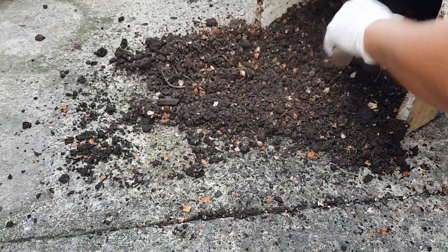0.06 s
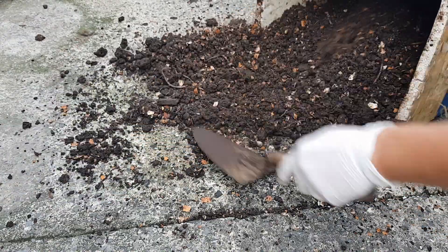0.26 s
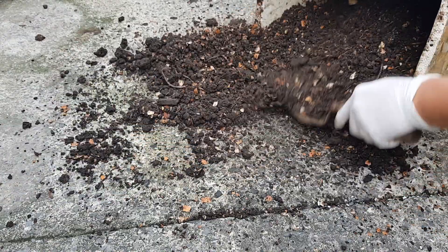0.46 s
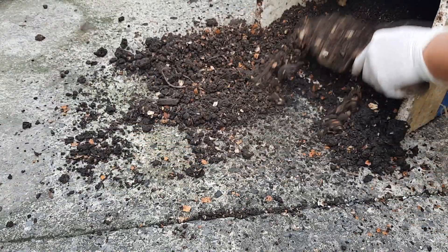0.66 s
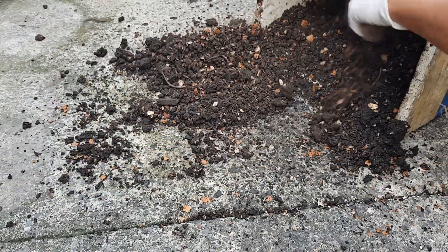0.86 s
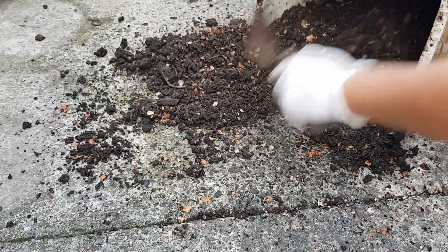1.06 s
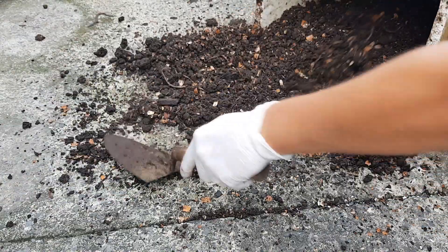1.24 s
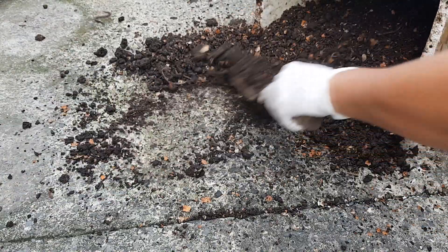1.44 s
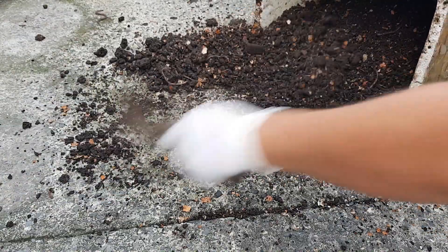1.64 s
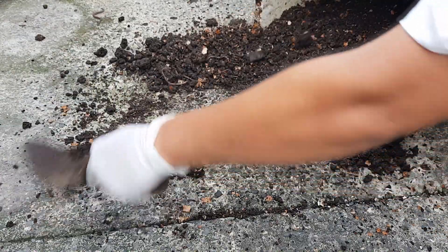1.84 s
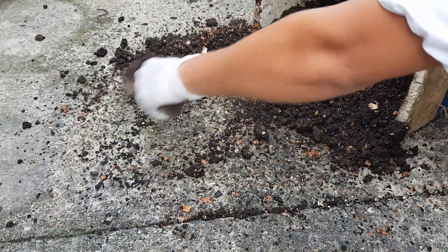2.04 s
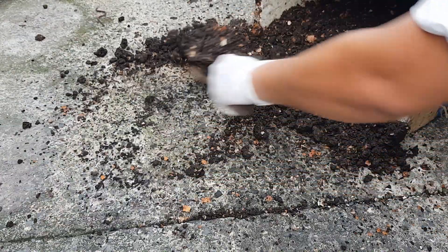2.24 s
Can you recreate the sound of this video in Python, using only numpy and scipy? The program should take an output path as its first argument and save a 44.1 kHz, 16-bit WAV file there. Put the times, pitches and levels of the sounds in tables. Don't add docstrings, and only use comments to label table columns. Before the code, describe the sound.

A small metal trowel scrapes gritty compost over rough concrete in three short, ringing strokes outdoors

```python
import sys
import numpy as np
from scipy import signal
from scipy.fft import rfft, irfft, next_fast_len
from scipy.io import wavfile
from scipy.ndimage import uniform_filter1d, map_coordinates

SR = 44100
rng = np.random.default_rng(int(sys.argv[2]) if len(sys.argv) > 2 else 0)


def dump(signal):
    limited = np.clip(np.atleast_2d(signal).T, -1, 1)
    pcm = np.round(limited * 32767).astype(np.int16)
    wavfile.write(sys.argv[1], SR, pcm)


def boost(x):
    u = np.asarray(x, float) / 20
    return 10 ** u


N = 101429

SKID_STARTS = [.330, .343, .370, .381, .403, .426, .438, .452, .467, .478, 1.279, 1.296, 1.324, 1.339,
               1.367, 1.390, 1.412, 1.438, 1.795, 1.82, 1.841, 1.858, 1.877, 1.902, 1.927, 1.947, 1.975,
               1.994, 2.014, 2.036, 2.107, 2.133, 2.161, 2.197, 2.245]
# pressure/dB, bare steel on concrete/dB, length/s
SKIDS = [(-32.5, -3, 0.021), (-20.5, 0.5, 0.017), (-21.5, 4, 0.016), (-21.5, -3.5, 0.013), (-21, 3, 0.011),
         (-29.5, -13.5, 0.01), (-25, -10.5, 0.0069), (-33.5, 6, .013), (-26.5, -15.5, 0.005),
         (-38, 0, 0.048), (-27.5, -1.5, 0.019), (-29, -2.5, 0.018), (-22.5, -2.5, 0.012),
         (-23.5, 7.5, 0.028), (-21, 0, 0.027), (-20.5, 0, 0.02), (-27.5, 1.5, 0.018), (-42.5, -17.5, 0.061),
         (-35.5, 1, 0.018), (-33.5, 0.5, 0.019), (-28, 3, .014), (-27.5, 3, 0.015), (-40, 0, .025),
         (-27, 8, 0.025), (-29, 5, .019), (-23, -1, 0.017), (-37.5, -3, 0.016), (-25, 0.5, 0.02),
         (-32, 5, 0.022), (-35.5, -4, 0.046), (-38, -10, 0.016), (-49.5, -10, .01), (-39, -4.5, 0.016),
         (-39.5, -26, 0.031), (-36, -23, 0.0081)]
# start t/s, pitch ratio
STROKES = [
    (0, 1.0),
    (1, .978),
    (1.6, .982),
]
# f/Hz, width/Hz, level/dB in strokes 1, 2 and 3
BLADE = [(1195, 70, -17.5, -16.5, -18.5), (1600, 100, -6, -6.5, -5), (1725, 54.4, 2.5, 1.5, 0.5),
         (2137, 79, -12, -6.5, -8.5), (2325, 43, -15, -20, -23.5), (2928, 80, -11.5, -5.5, -9),
         (3730, 72, -8, -12, -10.5), (4100, 36, -20, -5.5, -14), (4480, 99, -14, -17, -14),
         (5440, 77, -7.5, -22, -6.5), (6660, 82, -9.5, -25, -9), (9200, 540, -15, -13, -13),
         (10000, 284, -13, -17.5, -13), (15320, 430, -10.5, -11, -14.5)]
# f/Hz, level per Hz/dB
GRIT = [(150, -58), (250, -19), (1700, -9), (2910, -4.5), (3340, -9.5), (5440, -13.5), (8120, -5),
        (14700, -9), (16000, -40.5)]
# t/s, crack level/dB, ring level/dB, crack t60/s
CATCHES = [(.3445, -7, -28, 0.025), (.353, -13, -35, .015), (.3705, -5.5, -27, 0.019),
           (.3805, -5.5, -22, 0.017), (.3855, -6.5, -27, .02), (.403, 1.5, -9.5, 0.022),
           (.4255, -12.5, -34, 0.01), (.4388, -3, -51, 0.027), (.4676, -2, -30, 0.0092),
           (1.2796, -10, -26.5, 0.0143), (1.296, -8.5, -42, .018), (1.3245, -12, -26, 0.015),
           (1.3395, -10, -25, 0.0207), (1.359, -5.5, -22, .015), (1.3673, -5, -18, 0.023),
           (1.3725, -5, -14.5, .012), (1.3903, -4, -22, 0.024), (1.413, -17, -29.5, 0.024),
           (1.428, -12.5, -51, .015), (1.7952, -20.5, -36.5, .015), (1.835, -15.5, -38, .018),
           (1.8495, -9, -38, 0.03), (1.858, -5.5, -24, 0.018), (1.9035, -10.5, -33, .02),
           (1.918, -13.5, -43, .018), (1.927, -14, -28, .015), (1.930, -9, -31, 0.0098),
           (1.9475, -6, -43, .014), (1.996, -12.5, -47, 0.018), (2.017, -15.5, -34, 0.028),
           (2.042, -13.5, -36, .015), (2.111, -14, -52, .018), (2.1335, -29.5, -55, .02),
           (2.163, -20.5, -46, .022), (2.1825, -28.5, -43.5, .016), (2.198, -29.5, -56, .016),
           (2.206, -25.5, -50, 0.035), (2.2465, -19.5, -60, 0.022)]
# t/s, level/dB, f/Hz, t60/s
CLODS = [(0.055, -28.5, 285, 0.089), (0.074, -33, 237, 0.25), (0.230, -22, 262, 0.088),
         (0.594, -38, 405, 0.033), (0.734, -34.5, 247, 0.14), (0.753, -30.5, 235, 0.04),
         (0.887, -31, 266, 0.11), (0.916, -26, 266, 0.091), (.925, -30.5, 586, 0.037),
         (1.157, -41, 310, 0.049), (1.167, -30.5, 170, 0.057), (1.194, -33.5, 520, 0.03)]
# t/s, level/dB, f/Hz, t60/s
LANDINGS = [
    (.229, -23.5, 160.5, 0.079),
    (1.2792, -15.5, 757, 0.02),
    (1.795, -30.5, 463, 0.043),
    (2.109, -35, 573, 0.077),
    (2.246, -40.5, 584, 0.034),
]
# t/s, level/dB, f/Hz, t60/s
PEBBLES = [(0.2164, -33.5, 1644, 0.022), (0.2485, -9, 1020, 0.0053), (.289, -46, 2450, 0.0093),
           (0.2928, -30.5, 1663, 0.084), (.7, -46, 1716, 0.062), (1.2796, -16, 1410, 0.036),
           (1.3147, -15.5, 1754, 0.039), (1.7952, -27.5, 1250, 0.036), (1.8404, -26, 1890, 0.026),
           (2.1086, -27.5, 2820, 0.03), (2.1595, -38, 2640, 0.038), (2.2047, -32.5, 2886, 0.038),
           (2.134, -39, 2920, 0.03975), (2.2445, -24, 2530, 0.022)]
# t/s, level/dB, t60/s
CRUMBS = [(0.1187, -29.5, 0.047), (1.226, -36, 0.056), (1.7417, -38, 0.03), (1.7696, -36.5, 0.02),
          (0.648, -44, .03), (1.2, -44.5, 0.074), (2.164, -24.5, 0.028)]
# t/s, flow level/dB, coarseness/dB
TRICKLE = [(0, -54.5, -0.5), (.07, -49.5, 15.5), (.19, -55.5, 4), (.5, -45.5, 1.5), (.68, -56, 0.5),
           (.75, -43.5, 4.5), (.79, -57, -5), (.9, -48.5, -1.5), (.93, -52, 7.5), (1.14, -60.5, 3.5),
           (1.2, -47.5, 14.5), (1.27, -58.5, -1.5), (1.5, -50, -1), (1.62, -66.5, -7.5), (1.78, -54, -3.5),
           (2.1, -42, -2.5), (2.3, -49, -9.5)]
# f/Hz, level per Hz/dB
FINE = [(530, -48), (900, -14), (2450, -6.5), (2830, -9.5), (11100, -9.5), (16000, -10)]
COARSE = [(94, -2.5), (160, 3.5), (199, -5.5), (248, -3), (594, -10.5), (2500, -29.5), (3250, -42),
          (5500, -120)]
# f/Hz, level per Hz/dB
TRAFFIC = [(12, -68.5), (20, -9.5), (113, -7.5), (146, -16), (394, -67), (442, -86.5), (1890, -61),
           (3540, -43), (5000, -61), (6500, -103.5), (11000, -120)]
HISS = [(500, -29.5), (1500, 1), (4000, -5), (12000, -4), (16000, 0)]
# f/Hz, likeness (1 = the same)
ALIKE = [(100, .99), (600, .85), (1700, .93), (3000, .5), (10000, .1)]
FAR_ALIKE = [(60, 1), (300, 0.87), (1500, 0), (8000, 0)]
# f/Hz, level/dB
LEAN = [(200, -0.5), (600, -5), (1700, -2.5), (3000, -4), (8000, -1.5), (14000, -6)]
FAR_LEAN = [(100, 0), (600, -5), (10000, -6)]
# f/Hz, t60/s
YARD_T60 = [(300, 0.072), (2000, 0.14), (12000, 0.036)]

GRAINS_PER_S, GRAIN_SPREAD_DB, GRAIN_S = 2200, 2.6, .0010
GRIT_PATCHY_DB, RING_PATCHY_DB, RING_DB = 4, 3.2, -2
BITE_S, BITE_GAIN, BITE_FADE_S = 0.0016, 0.54, 0.004
SAG_DB_PER_S, LIFT_DB_PER_S = 136, 1500.5
BENDING_HZ = 2000
MODE_SCATTER_DB, CATCH_DULL_DB_PER_OCTAVE = 4.5, -4
TRICKLE_PATCHY_DB, LUMPY_DB, COARSE_DB = 2, 2.2, -49.5
TRAFFIC_DB, HISS_DB, YARD_DB = -40.5, -60, -12.5
BIRD_S, BIRD_LENGTH_S, BIRD_FALL_S, BIRD_DB = 1.675, .11, .03, -58
BIRD_HIGH_HZ, BIRD_LOW_HZ, BIRD_BLUR_HZ = 3900, 2350, 190
SCATTER_T60, LEFT_LEAD_S = 0.0034, .00007
NEAR_DIP_HZ, NEAR_DIP_WIDTH_HZ, NEAR_DIP_DB = 3220, 150, -11
PORT_DIP_HZ, PORT_DIP_WIDTH_HZ, PORT_DIP_DB = 8110, 820, -7
LOW_CUT_HZ, TOP_HZ, SKIRT_DB, LIMIT = 44, 15900, -43, .9


def scrape():
    crunch, shake = np.zeros(N), np.zeros(N)
    t = np.arange(SR // 6) / SR
    for s, (pressure_db, bare_db, length) in zip(SKID_STARTS, SKIDS):
        lift_db = LIFT_DB_PER_S * np.maximum(t - length, 0)
        skid = boost(pressure_db - SAG_DB_PER_S * t - lift_db) * (1 - np.exp(-t / BITE_S))
        skid = skid * (1 + BITE_GAIN * np.exp(-t / BITE_FADE_S))
        add(crunch, s, skid)
        add(shake, s, boost(bare_db) * skid)
    rough = grains(GRAINS_PER_S, GRAIN_SPREAD_DB)
    jolts = patchy(rough, RING_PATCHY_DB, bins=2, frames=5)
    stroke_now = loading()
    ringing = np.zeros(N)
    for k in range(len(STROKES)):
        ringing += filtered(jolts * shake * (stroke_now == k), lambda hz: steel(hz, k))
    ringing /= np.std(filtered(jolts, lambda hz: steel(hz, stroke=0)))
    grit = patchy(coloured(rough, GRIT), GRIT_PATCHY_DB, bins=9, frames=3)
    return crunch * grit + boost(RING_DB) * ringing


def catches():
    out, t = np.zeros(N), np.arange(SR // 8) / SR
    stroke_now = loading()
    grit = coloured(rng.standard_normal(N), GRIT)
    scatter = rng.standard_normal((len(CATCHES), len(BLADE), 1))
    for (s, crack_db, ring_db, t60), luck in zip(CATCHES, scatter):
        hz, width, level = modes(stroke_now[round(s * SR)])[:, :, None]
        dull_db = CATCH_DULL_DB_PER_OCTAVE * np.log2(hz / hz.min())
        luck_db = MODE_SCATTER_DB * luck * (level < level.max())
        swell_and_fade = np.exp(-np.pi * width * t) * (1 - np.exp(-t / 0.00034))
        notes = boost(level + dull_db + luck_db) * swell_and_fade * np.sin(2 * np.pi * hz * t)
        piece = grit[round(s * SR):][:len(t)]
        add(out, s, boost(ring_db + 7.0) * notes.sum(0))
        add(out, s, boost(crack_db - 10.5 - 60 * t[:len(piece)] / t60) * piece)
    return out


def modes(stroke):
    hz, width, *levels = np.transpose(BLADE)
    pitch = np.where(hz < BENDING_HZ, STROKES[stroke][1], 1)
    return np.array([hz * pitch, width, levels[stroke]])


def steel(hz, stroke):
    answer = 0
    for k, (centre, width, db) in enumerate(modes(stroke).T):
        damping = 1j * hz * width
        answer = answer + (-1) ** k * boost(db) * damping / (centre * centre - hz * hz + damping)
    return answer


def loading():
    return np.searchsorted(np.transpose(STROKES)[0][1:], np.arange(N) / SR)


def grains(per_s, spread_db):
    chance, size = rng.random((2, N))
    starts = (chance < per_s / SR) * boost(-spread_db * np.log(size + 0.0095))
    bursts = signal.fftconvolve(starts, np.exp(-np.arange(600) / SR / GRAIN_S))[:N]
    return (bursts + 0.22) * rng.standard_normal(N)


def soil():
    clods = knocks(CLODS, soft_s=0.00074, puff_db=-7.5, low_hz=210, tilt_hz=605)
    landings = knocks(LANDINGS, soft_s=0.0019, puff_db=-13, low_hz=400, tilt_hz=1200)
    pebbles = knocks(PEBBLES, soft_s=0.00086, puff_db=-6, low_hz=600, tilt_hz=4000)
    return clods + landings + pebbles + crumbs()


def knocks(rows, soft_s, puff_db, low_hz, tilt_hz):
    tones, puffs = np.zeros(N), np.zeros(N)
    t = np.arange(SR // 6) / SR
    for s, db, hz, t60 in rows:
        fall = boost(db - 60 * t / t60) * (1 - np.exp(-t / soft_s))
        add(tones, s, fall * np.sin(2 * np.pi * hz * t))
        add(puffs, s, fall)
    dull = filtered(rng.standard_normal(N), lambda hz: hz / (hz + low_hz) / (1 + (hz / tilt_hz) ** 4))
    return tones + boost(puff_db) * puffs * unit(dull)


def crumbs():
    ticks, t = np.zeros(N), np.arange(SR // 6) / SR
    for s, db, t60 in CRUMBS:
        add(ticks, s, boost(db + 0.5 - 60 * t / t60))
    bright = filtered(rng.standard_normal(N), lambda hz: hz ** 4 / (hz ** 4 + 7500 ** 4))
    return ticks * unit(bright)


def trickle():
    flow_db, coarse_db = curves(TRICKLE)
    fine = patchy(coloured(grains(3200, 1.3), FINE), TRICKLE_PATCHY_DB, bins=9, frames=20)
    coarse = coloured(rng.standard_normal(N), COARSE)
    coarse_level = boost(COARSE_DB + coarse_db + LUMPY_DB * wobble(40.48))
    return boost(flow_db + wobble(34)) * fine + coarse_level * coarse


def yard(x):
    hz, t, z = signal.stft(rng.standard_normal((2, SR // 3)), SR, nperseg=256)
    fade = boost(-60 * t / along(YARD_T60, hz)[:, None])
    tail = signal.istft(z * fade, SR, nperseg=256)[1]
    late = np.pad(x, (300, 0))[None]
    return signal.fftconvolve(late, tail / np.linalg.norm(tail[0]), axes=1)[:, :N]


def bird():
    t = np.clip(np.arange(N) / SR - BIRD_S, 0, BIRD_LENGTH_S)
    fall_hz = (BIRD_HIGH_HZ - BIRD_LOW_HZ) * np.exp(-t / BIRD_FALL_S)
    hz = BIRD_LOW_HZ + fall_hz + BIRD_BLUR_HZ * wobble(340)
    loudness = boost(BIRD_DB) * np.sin(np.pi * t / BIRD_LENGTH_S) ** .5
    return loudness * np.sin(2 * np.pi * np.cumsum(hz) / SR)


def background():
    hiss = boost(HISS_DB) * coloured(rng.standard_normal(N), HISS)
    traffic = boost(TRAFFIC_DB) * coloured(rng.standard_normal(N), TRAFFIC)
    return trickle() + hiss + traffic


def unit(x):
    return x / np.sqrt(np.mean(x ** 2) + 1e-20)


def along(points, hz):
    f, v = np.transpose(points)
    return np.interp(np.log(hz + 1), np.log(f + 1), v)


def curves(rows):
    s, *cols = np.transpose(rows)
    return [np.interp(np.arange(N) / SR, s, c) for c in cols]


def wobble(rate):
    knots = rng.standard_normal(int(N * rate / SR) + 4)
    return map_coordinates(knots, [np.arange(N) * rate / SR])


def filtered(x, response):
    m = next_fast_len(N + SR // 2)
    return irfft(rfft(x, m) * response(np.fft.rfftfreq(m, 1 / SR)), m)[..., :N]


def coloured(x, spectrum):
    return unit(filtered(x, lambda hz: boost(along(spectrum, hz))))


def patchy(x, depth_db, bins, frames):
    z = signal.stft(x, nperseg=256)[2]
    field = uniform_filter1d(rng.standard_normal(z.shape), bins, 0)
    field = uniform_filter1d(field, frames, 1)
    return unit(signal.istft(z * boost(depth_db * unit(field)), nperseg=256)[1][:N])


def add(track, s, sound):
    part = track[round(s * SR):][:len(sound)]
    part += sound[:len(part)]


def ports(x, other, alike, lean, lead_s=0):
    def share(hz):
        turn = np.arccos(np.clip(along(alike, hz), -1, 1)) / 2
        return np.array([np.cos(turn), np.sin(turn)])

    def tilt(hz):
        level = boost(np.outer([.5, -.5], along(lean, hz)))
        return level * np.exp(np.outer([1j, -1j], np.pi * hz * lead_s))

    mid, side = filtered(np.array([x, other]), share)
    return filtered(np.array([mid + side, mid - side]), tilt)


def dip(hz, centre, width, db):
    return boost(db * np.exp(-((hz - centre) / width) ** 2))


def scene():
    near, other = (scrape() + catches() + soil() for _ in range(2))
    bounce = rng.standard_normal(900) * boost(-60 * np.arange(900) / SR / SCATTER_T60)
    scattered = signal.fftconvolve(other, bounce / np.linalg.norm(bounce))[:N]
    far = ports(background() + bird(), background(), FAR_ALIKE, FAR_LEAN)
    close = ports(near, scattered, ALIKE, LEAN, LEFT_LEAD_S) + boost(YARD_DB) * yard(near)
    return filtered(close, lambda hz: dip(hz, NEAR_DIP_HZ, NEAR_DIP_WIDTH_HZ, NEAR_DIP_DB)) + far


def top_cut(x):
    return signal.sosfilt(signal.butter(12, 16810, fs=SR, output="sos"), x)


def record(dry):
    def band(hz):
        top = np.where(hz < TOP_HZ, 1, boost(SKIRT_DB))
        return top * hz ** 4 / (hz ** 4 + LOW_CUT_HZ ** 4)

    x = filtered(dry, lambda hz: dip(hz, PORT_DIP_HZ, PORT_DIP_WIDTH_HZ, PORT_DIP_DB))
    limited = x / (1 + np.abs(x / LIMIT) ** 4) ** 0.31
    return top_cut(filtered(limited, band))


dry = scene()
out = record(dry)
dump(out)
```